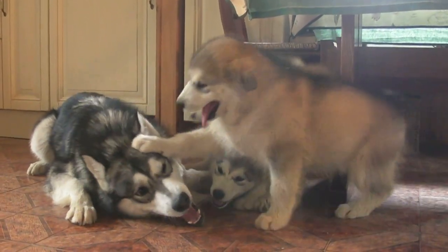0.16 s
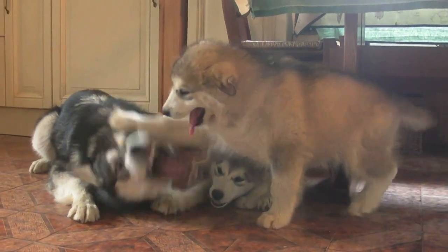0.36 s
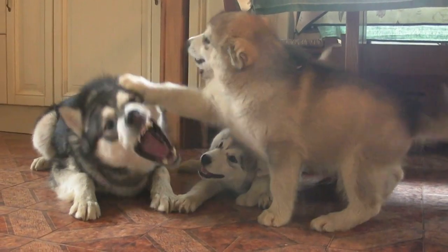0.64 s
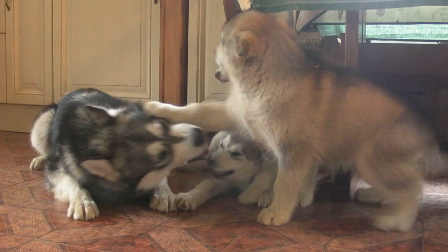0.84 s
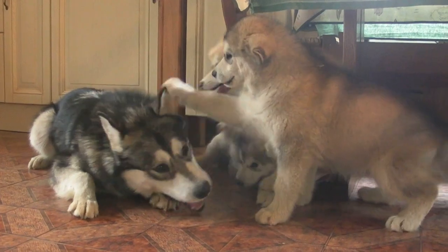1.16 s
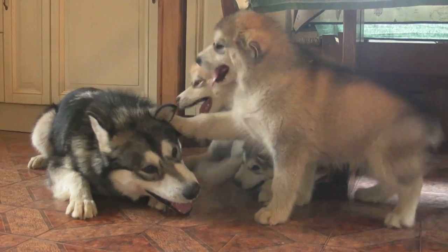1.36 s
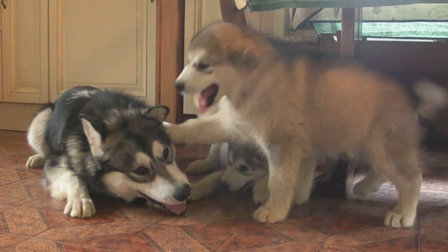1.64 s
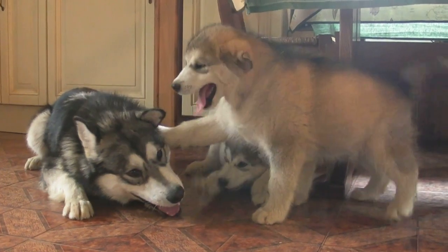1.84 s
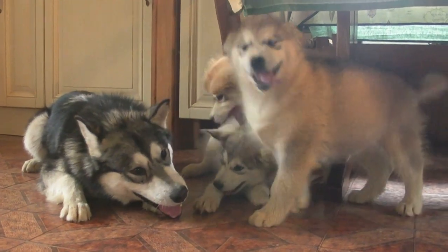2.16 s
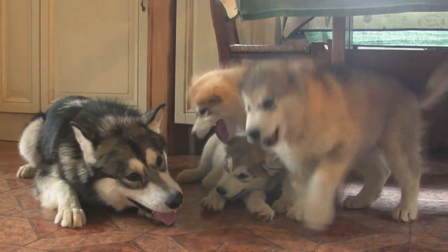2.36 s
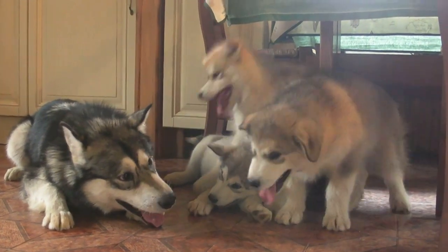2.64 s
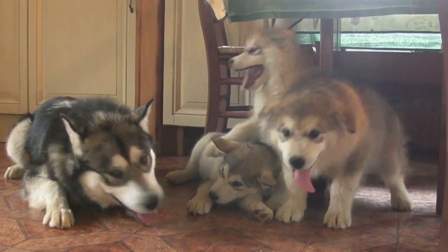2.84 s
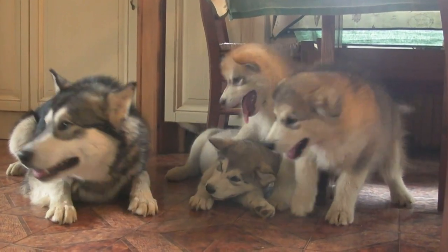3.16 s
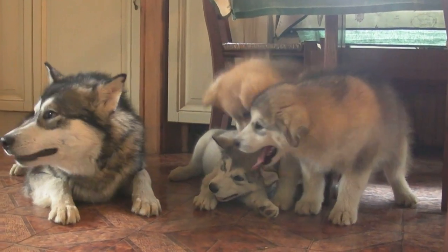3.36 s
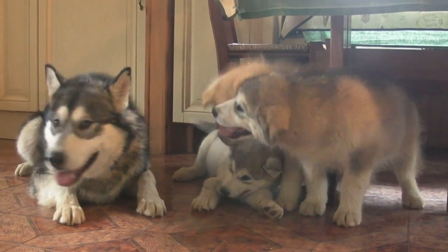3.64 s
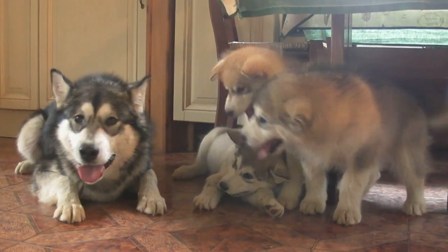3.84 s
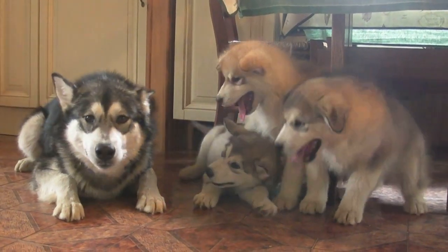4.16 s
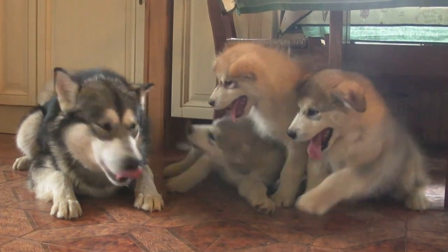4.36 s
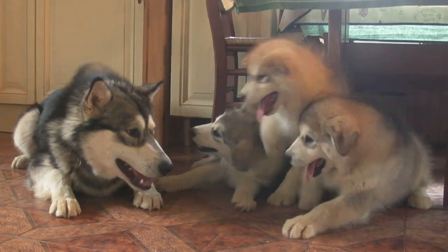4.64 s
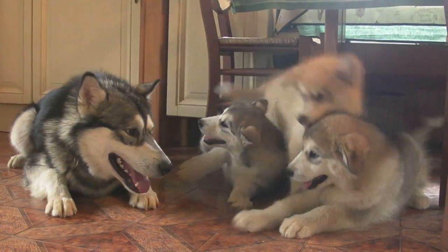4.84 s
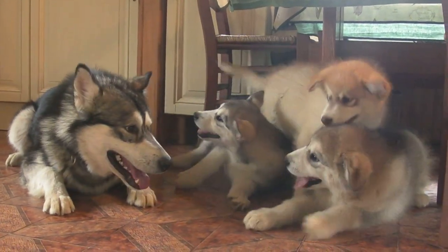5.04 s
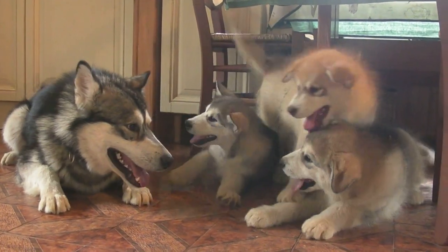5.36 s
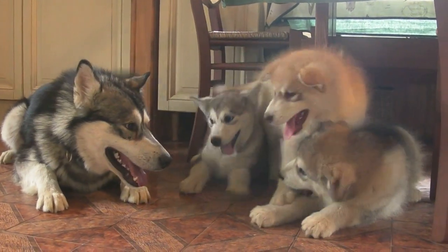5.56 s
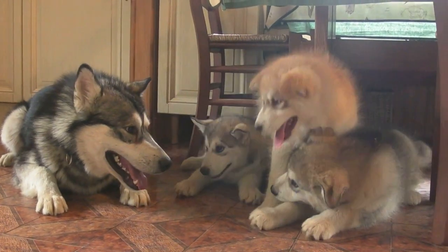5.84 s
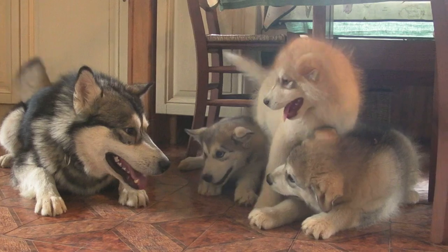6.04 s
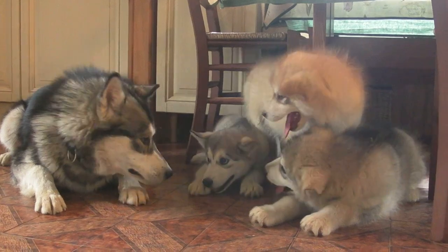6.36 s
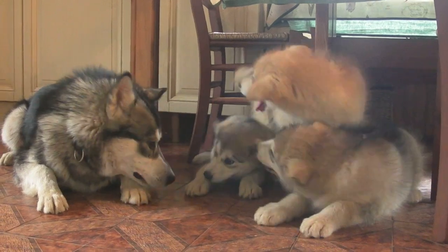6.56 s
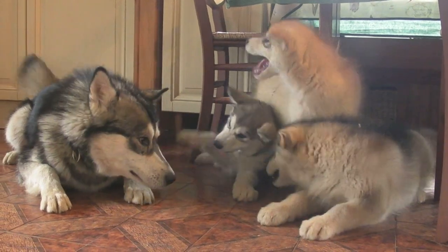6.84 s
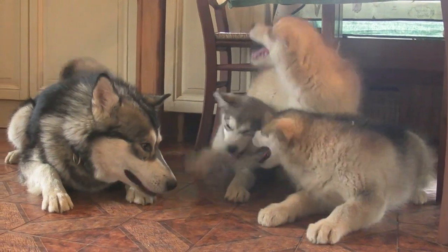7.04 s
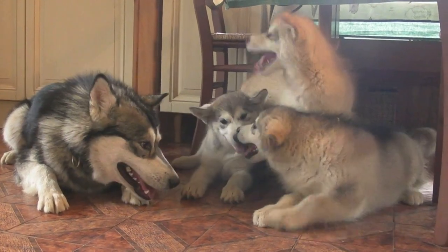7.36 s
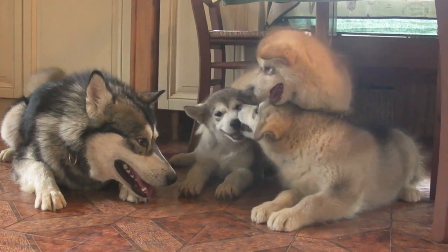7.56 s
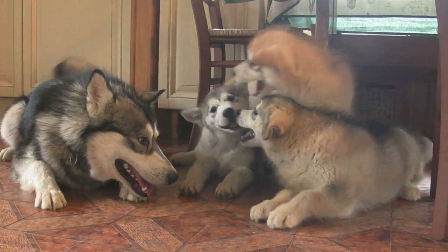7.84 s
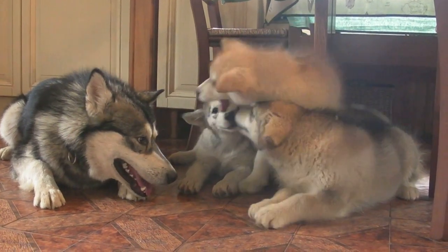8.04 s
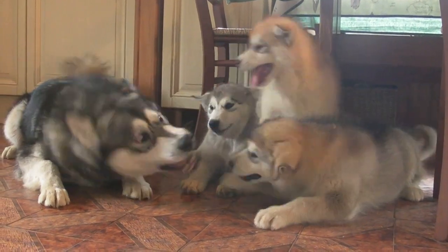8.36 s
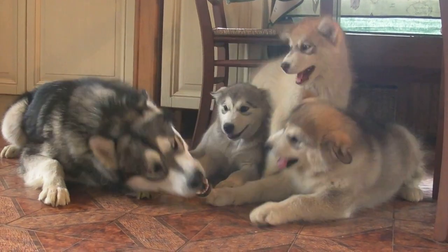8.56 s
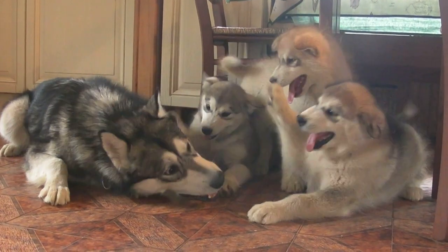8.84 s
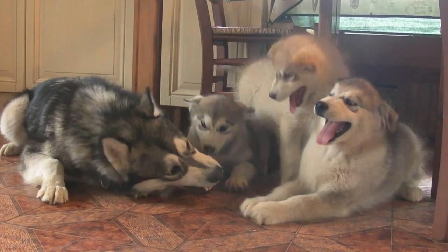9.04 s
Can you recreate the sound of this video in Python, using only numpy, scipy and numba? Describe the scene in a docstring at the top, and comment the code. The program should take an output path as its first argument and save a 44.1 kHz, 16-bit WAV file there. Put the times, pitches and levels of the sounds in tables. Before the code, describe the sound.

In a bare, echoing kitchen, a tiny nose whistle and sharp puppy yelps open the scene. A grown dog gives a short low snarl, something metal clinks, and longer wavering yelps follow. After about four and a half seconds the calls shrink to short yips and piercing thin whistles, with paw thumps, claw ticks and muzzle puffs. The dog snarls again near the end. Close stereo pickup, faint room noise.

```python
"""A tiny nose whistle and a pup's sharp yelp come first, in a bare kitchen that rings after every call.
More yelps, short yips and thin whistles follow, and a grown dog snarls back.
The voices are stacks of harmonics with uneven cycles and rasping air; the whistles are wavering sines.
Paws thump, claws tick, fur rustles and muzzles puff, all made of shaped noise; something metal clinks.
A faint, restless room noise lies under it all."""
import sys
import numpy as np
from scipy import signal
from scipy.fft import rfft, irfft, next_fast_len
from scipy.io import wavfile
from scipy.ndimage import uniform_filter1d, minimum_filter1d
from numba import njit

SR = 44100
rng = np.random.default_rng(int(sys.argv[2]) if len(sys.argv) > 2 else 0)


def wav_out(sig):
    """Save sig, one row per channel (or a flat mono array), as 16-bit PCM at SR to the path in sys.argv[1]."""
    wavfile.write(sys.argv[1], SR, np.round(np.clip(np.atleast_2d(sig).T, -1, 1) * 32767).astype(np.int16))


N = 405797
T = np.arange(N) / SR  # time in seconds
TOP_HZ = 15500  # no voice overtone lies above this, and the final sound is cut off here

# All levels in the tables are relative: mixing, room and gain control come later.
# Colour of the room noise: columns f/Hz, level/dB
FLOOR_COLOUR = [(15, -47), (25, -17.5), (113, -9.5), (144, -5), (340, -17.5), (509, -3), (666, -10.5),
                (722, -8.5), (1050, -10), (1450, -8.5), (3090, -15), (4870, -17), (6210, -20.5),
                (10100, -18), (15500, -24)]
FLOOR_DB = -44.5  # room noise level before it flutters
# Wall echoes, one row a band: columns f/Hz, t60/s (time to fade by 60 dB), level/dB
ROOM_BANDS = [(150, 0.69, -2), (487, 0.29, -1), (1200, 0.41, 0.5), (2600, 0.45, 0), (6360, 0.41, 4),
              (13600, 0.28, 6.5)]

# Air blown through a muzzle: columns t/s (middle of the puff), length/s, level/dB
PUFFS = [(1.232, 0.031, -28.5), (1.575, 0.16, -24), (2.277, 0.26, -26), (4.27, 0.094, -25),
         (4.556, 0.13, -31.5), (4.864, 0.25, -41), (5.078, 0.13, -29.5), (5.547, 0.12, -31),
         (5.68, 0.091, -41), (6.636, 0.18, -33.5), (7.274, 0.077, -35.5), (7.779, 0.034, -43),
         (8.005, 0.12, -40), (8.175, 0.25, -38), (8.755, 0.12, -33), (8.872, 0.081, -30.5)]
# Colour of blown air, also used for scraping: columns f/Hz, level/dB
PUFF_COLOUR = [(200, -33), (600, 9.5), (1200, 1.5), (1600, 7), (2100, 15), (2700, -0.5), (3300, 5.5),
               (4500, 2), (7000, -3), (11000, -12), (15000, -34)]
# Paws and bodies landing: columns t/s, level/dB
THUMPS = [(.208, -31), (.705, -16.5), (1.477, -33), (2.754, -23), (4.695, -25), (4.858, -20.5),
          (7.164, -26), (8.389, -28.5), (8.715, -23), (9.109, -25)]
# Colour of a landing: columns f/Hz, level/dB
THUMP_COLOUR = [(30, -35), (75, 2), (110, -8.5), (170, 0.5), (300, -12.5), (700, -9), (2000, -22),
                (8000, -38)]
# Claws and teeth: columns t/s, level/dB
TICKS = [(0.2239, -11), (1.2144, -32), (3.5863, -11), (4.8494, -24.5), (7.009, -35), (7.1694, -41),
         (7.46, -38), (8.111, -27), (8.31, -25.5), (8.8538, -33)]
# Colour of a tick, also used for rustling and whistle hiss: columns f/Hz, level/dB
TICK_COLOUR = [(200, -10), (800, -2), (2200, 0), (4500, -3), (9000, -7), (15000, -14)]
# One knock on something metal: t/s, level/dB
CLINK = (1.102, -20)
# The notes the metal rings at: columns f/Hz, level/dB, t60/s
CLINK_MODES = [(1710, -29, 0.34), (1637, -6.5, 0.22), (2330, -4, 0.25), (2393, -6, 0.12), (3470, -15, 0.2),
               (4630, -24, 0.51), (5650, -22, 0.48)]

# Drawn-out nose whistles, one curve each: columns t/s, pitch f/Hz, level/dB
WHINES = [
    [(5.815, 7200, -20), (5.835, 6590, -13), (5.87, 6540, -8), (5.908, 6444, -9), (5.92, 6970, -23),
     (5.95, 7120, -38)],
    [(6.543, 6350, -25), (6.565, 6125, -11.5), (6.59, 6250, -6), (6.61, 6640, -10), (6.635, 7440, -20),
     (6.68, 7500, -29)],
    [(7.85, 6110, -17), (7.885, 6334, -6), (7.912, 6800, -7), (7.94, 6680, -10.5), (8.02, 6780, -27)],
]
# Brief nose whistles, one glide each: columns t/s, length/s, start f/Hz, end f/Hz, level/dB, fade/dB
CHIRPS = [(0.034, 0.013, 6220, 6460, 2, 10.5), (1.179, 0.029, 6024, 6490, -3.5, 16),
          (1.36, 0.079, 6500, 6600, -29.5, 3), (1.742, 0.021, 6200, 6430, -19, 17.5),
          (2.222, 0.074, 6490, 6200, -17.5, 11.5), (2.739, 0.013, 6230, 6420, -18, 7.5),
          (5.426, 0.036, 5930, 6390, -21.5, 2.5), (5.56, 0.02, 7250, 6770, -20, 9.5),
          (5.72, 0.017, 5970, 6450, -20, 3), (6.062, 0.036, 6200, 6710, -9.5, 11),
          (6.367, 0.017, 6730, 6880, -21.5, 3), (6.887, 0.036, 6600, 6970, -15.5, 21),
          (7.227, .026, 5940, 6880, 4.5, 38.5), (8.134, 0.041, 6215, 6580, -15.5, 1.5),
          (8.445, 0.026, 6500, 6280, -24, 8.5)]

# Snarls of the grown dog; the curves at 0.733 and 0.853 s are one snarl, first at halved pitch:
# columns t/s, pitch f/Hz, level/dB
SNARLS = [
    [(.66, 131, -26), (.728, 169.6, -40)],
    [(.733, 129.1, -10), (.795, 135.9, -7.5), (.85, 126.2, -21)],
    [(.853, 252, -13), (.87, 237.3, -13.5), (.91, 208.4, -22.5), (.965, 241.7, -26), (1.0, 198, -36)],
    [(8.388, 277.8, -29), (8.41, 282.8, -10), (8.45, 324.5, -8.5), (8.49, 338, -16), (8.55, 329, -16),
     (8.6, 357.4, -5), (8.63, 376.4, 3), (8.65, 376.6, -22), (8.71, 376.4, -24), (8.76, 368.6, -17.5),
     (8.83, 396, -34.5)],
    [(9.135, 259, -17), (9.155, 291.4, -8.5), (9.18, 326, -5), (9.2, 346, -3)],
]
# How the dog's throat colours the upper harmonics of a snarl: columns f/Hz, level/dB
DOG_THROAT = [(350, -19), (700, -1), (1050, 5), (1600, -8), (2100, -18), (2800, -34.5), (4000, -31.5),
              (8000, -47.5), (15000, -49)]
# The two lowest harmonics: level in dB at curve level 0, and dB gained per dB of curve level
SNARL_FIRST_DB, SNARL_FIRST_GROWTH = -28.5, 0.13
SNARL_SECOND_DB, SNARL_SECOND_GROWTH = -13.5, 0.72
SNARL_ROUGH, SNARL_ROUGH_PER_S = .22, 2.6  # roughness at the start of a curve, and its growth per second

# Short yips: columns t/s, length/s, start f/Hz, middle f/Hz, end f/Hz, level/dB, drop towards both ends/dB,
# second harmonic level/dB, upper harmonics level/dB, roughness (0-1)
YIPS = [(4.898, 0.041, 320, 316.5, 322, -13.5, -1, 2.5, -10, 0.13),
        (5.022, 0.062, 550, 520.6, 474, -8.5, 14, 6.5, 1.5, 0.81),
        (5.752, .055, 907, 1128, 1206, -1, 6.5, 3.5, -20, 0.061),
        (6.18, 0.031, 567, 493, 412, -9.5, 0.5, 1.5, 6, 0.43),
        (6.549, 0.055, 300, 306, 303, -22, 7, -6, -8, 0.76),
        (6.72, .075, 428, 552, 593, -11.5, 8, -0.5, 5.5, 0.61),
        (6.786, .095, 590, 546, 484, -6.5, 6, 2.5, -3.5, 0.16),
        (7.045, 0.033, 482, 432.3, 378, -13, 0, -4, -0.5, 0.62),
        (7.98, 0.052, 703, 676, 644, -30, 3, -10, -20, 0.3),
        (8.207, 0.018, 754, 725, 666, -19, 2.5, -20, -28, 0.1),
        (8.843, 0.026, 440, 410.5, 389, -16, 1, -9, -6, 0.21),
        (9.03, 0.09, 488, 582.6, 468, -8, 15.5, 4.5, 2, 0.27)]
# How the throat colours the upper harmonics of a yip: columns f/Hz, level/dB
YIP_THROAT = [(1100, -0.5), (1500, 2), (1900, -3.5), (2300, 1.5), (2550, -4.5), (2850, 4.5), (3400, -11.5),
              (4100, -13.5), (5200, -17.5), (6500, -18), (9000, -25), (15000, -23)]
YIP_FADE_DB = 4  # fade from the start to the end of a yip

# Yelps: columns second harmonic level/dB, upper harmonics level/dB, curve of (t/s, pitch f/Hz, level/dB)
YELPS = [ (-2.5, 1, [(.048, 644, -12.5), (.07, 912, -8.5), (.09, 1230, 0), (.115, 1298, -6.5),
         (.15, 1245, -6)]), (-1, -1.5, [(.222, 1110, 0), (.26, 1172, -1.5), (.292, 1372, -4),
         (.325, 1175, 1.5), (.345, 1162, -12), (.38, 1093, 5.5), (.43, 1073, 7.5), (.475, 981, 0.5),
         (.52, 1116, 5.5), (.545, 1054, 0.5), (.565, 833, -10), (.59, 510, -9.5)]),
         (-1, 0.5, [(1.378, 595, -20), (1.398, 656, -10.5), (1.425, 959.5, -10), (1.46, 988, -15.5),
         (1.5, 917, -13.5), (1.55, 959, -11.5), (1.575, 865, -27.5), (1.6, 570, -23)]),
         (4.5, -3, [(1.767, 828, -5), (1.785, 990, -6), (1.81, 1282, -1.5), (1.83, 1527, -12),
         (1.86, 1244, -20)]), (-1.5, 2.5, [(1.908, 1202, -5), (1.935, 1128, -7), (1.97, 1245, 0),
         (2.0, 1286, -3.5), (2.025, 909, -10), (2.05, 631.6, -16), (2.1, 575.5, -19.5)]),
         (-0.5, -0.5, [(2.17, 617.4, -26.5), (2.215, 745.5, -17), (2.255, 692, -19.5), (2.29, 594, -7.5),
         (2.32, 649, -15), (2.35, 818, -2), (2.385, 787, -4.5), (2.45, 870, 4), (2.505, 989, 2),
         (2.54, 932, -7), (2.575, 673, -5.5), (2.61, 479, -11.5)]), (2, 2.5, [(2.753, 577.6, 0),
         (2.775, 628, -2.5), (2.805, 958, -3.5), (2.85, 837.3, -0.5), (2.96, 912, 1), (3.01, 969.4, -2),
         (3.05, 874, -5), (3.1, 779.3, 1), (3.16, 772.6, -2), (3.22, 734, -15.5), (3.27, 594, -7.5),
         (3.34, 595, -0.5), (3.39, 568, -1.5), (3.41, 523, -5)]), (2.5, -1, [(3.583, 567, 0.5),
         (3.62, 823, -7.5), (3.635, 1198, 1.5), (3.657, 1566, -3.5), (3.7, 1204, -13), (3.75, 998, -8),
         (3.79, 929, -2.5), (3.803, 789.3, 0.5), (3.84, 798, -9), (3.875, 692, -12.5), (3.98, 648.4, -9),
         (4.1, 741.7, 2.5), (4.15, 691, -12), (4.19, 532, -10.5)]), (-1, 2, [(4.334, 555, 6),
         (4.355, 704, -3), (4.378, 791, -3), (4.39, 1137, 7), (4.42, 1125, -4.5), (4.46, 1096, 0),
         (4.475, 1000, -15), (4.51, 592, -17.5), (4.56, 550.8, -18.5)]), ]
# How the pup's throat colours the upper harmonics of a yelp: columns f/Hz, level/dB
PUP_THROAT = [(900, -1), (1700, 5.5), (2300, 2.5), (3000, -0.5), (3600, -6.5), (4100, -21), (5300, -25),
              (6400, -20.5), (8000, -35), (12000, -37), (15000, -58)]
# How the pup's open mouth favours the two lowest harmonics of a yelp: columns f/Hz, level/dB
MOUTH = [(500, -10.5), (700, -6.5), (900, 3), (1100, 2.5), (1400, -4), (1750, 8.5), (2000, -1.5),
         (2250, -6.5), (2600, -13.5), (3000, -11.5)]
# Upper harmonics of a yelp by its pitch, weak in the highest yelps: columns pitch f/Hz, level/dB
YELP_OVERTONES = [(570, -9), (700, -5), (850, -4.5), (980, -3.5), (1100, -15.5), (1280, -27)]
# Overtones gain extra dB per dB above an easy yelp, and a little more as a yelp ends
EASY_DB, OVERTONE_GROWTH, ENDING_BRIGHT_DB, ENDING_S = -3.5, 0.067, 1, 0.028
# A yelp is clear above one pitch, grows hoarse towards the other, and low endings break up
CLEAR_HZ, HOARSE_HZ = 764, 500
CLEAR_ROUGH, LOW_ROUGH, END_ROUGH, BREAK_S = 0.12, 0.067, 0.53, 0.037


def undb(db):
    """Turn decibels into gain."""
    return 10 ** (np.asarray(db) / 20)


def on_log_axis(hz, points):
    """Read a curve of (Hz, value) points at any frequency, evenly per octave."""
    f, value = np.transpose(points)
    return np.interp(np.log(np.maximum(hz, 1)), np.log(f), value)


def noise(colour, size):
    """Random hiss in a given colour, scaled to an average strength (rms) of one."""
    n = next_fast_len(size, real=True)
    spectrum = rfft(rng.standard_normal(n))
    y = irfft(spectrum * undb(on_log_axis(np.fft.rfftfreq(n, 1 / SR), colour)), n)
    return y[:size] / y.std()


def walk(rate, size):
    """Smooth random wandering with a spread near 1, reaching a new value rate times a second."""
    at = np.arange(size) * rate / SR
    i = at.astype(int) % 1024
    points = rng.standard_normal(1025)
    return points[i] + (points[i + 1] - points[i]) * np.sin(np.pi / 2 * (at % 1)) ** 2


def add(track, s, sound):
    """Mix a sound into a track at a time in seconds."""
    i = max(int(s * SR), 0)
    track[i:i + len(sound)] += sound[:max(N - i, 0)]


def ring_down(t, t60):
    """A steady fade that loses 60 dB in t60 seconds."""
    return np.exp(-np.log(1000) * t / t60)


def background(flutter_db, side_db):
    """Faint room noise with a wandering level; a noise of opposite sign left and right widens it."""
    mid = noise(FLOOR_COLOUR, N) * undb(flutter_db * walk(9.8, N))
    side = undb(side_db) * noise([(100, -7), (2000, -16), (7000, 0), (15000, -4)], N)
    return undb(FLOOR_DB) * np.array([mid + side, mid - side])


def room(gap_s, build_s, width):
    """Dense wall echoes as fading noise, band by band; left and right differ mostly in the treble."""
    size = 32768
    t, f = T[:size], np.fft.rfftfreq(size, 1 / SR)
    spectra, echoes = rfft(rng.standard_normal((2, size))), 0
    band_hz = np.array(ROOM_BANDS)[:, 0]
    for (hz, t60, db), share in zip(ROOM_BANDS, np.eye(len(ROOM_BANDS))):
        band = on_log_axis(f, np.column_stack([band_hz, share]))
        decay = ring_down(t, t60) * np.clip((t - gap_s) / build_s, 0, 1)
        mid, side = undb(db) * irfft(spectra * band) * decay / np.linalg.norm(decay)
        side = side * min(0.012 + width * (hz / 6500) ** 2, .5)
        echoes = echoes + np.array([mid + side, mid - side])
    return echoes


def rustle(db, swell_db, grain_db):
    """Fur and paws brush the floor: bright noise with an uneven, grainy level."""
    return undb(db + swell_db * walk(3, N) + grain_db * walk(250, N)) * noise(TICK_COLOUR, N)


def puffs():
    """The dogs huff: blown air is noise that swells and sinks softly."""
    swell = sum(undb(db) * np.exp(-2 * (2 * (T - s) / length) ** 2) for s, length, db in PUFFS)
    return swell * noise(PUFF_COLOUR, N)


def hits(events, colour, decay_s):
    """Short dead blows on the floor: noise that starts at once and dies away quickly."""
    out, t = np.zeros(N), T[:SR // 4]
    for s, db in events:
        envelope = np.exp(-t / decay_s) * np.minimum(t / 0.00085, 1)
        add(out, s, undb(db) * noise(colour, len(t)) * envelope)
    return out


def clink(rattle, scrape_db):
    """A few metal notes ring down while the thing rattles and scrapes on the floor."""
    out, t = np.zeros(N), T[:SR // 2]
    ring = np.zeros(len(t))
    for hz, db, t60 in CLINK_MODES:
        rattling = 1 + rattle * walk(268, len(t))
        ring += undb(db) * rattling * np.sin(2 * np.pi * hz * t) * ring_down(t, t60)
    scrape = undb(scrape_db) * noise(PUFF_COLOUR, len(t)) * np.exp(-t / 0.041)
    start, level_db = CLINK
    add(out, start, undb(level_db) * (ring + scrape) * np.minimum(t / 0.004, 1))
    return out


def contour(rows, attack_s, release_s):
    """A call's smoothed control curves, and the gate that opens and closes it."""
    s, *columns = np.transpose(rows)
    t = np.arange(s[0], s[-1] + release_s, 1 / SR)
    opening = np.clip((t - s[0]) / attack_s, 0, 1)
    closing = np.clip((t[-1] - t) / release_s, 0, 1)
    curves = [uniform_filter1d(np.interp(t, s, c), size=300) for c in columns]
    return s[0], opening * closing, curves


def chirp_controls(start, length, from_hz, to_hz, db, fade_db):
    """A brief whistle is one straight glide of pitch and level."""
    return [(start, from_hz, db), (start + length, to_hz, db - fade_db)]


def whistles(waver, octave_db, air_db):
    """Air whistles in the nose: a wavering near-sine with a faint octave, over the hiss of the jet."""
    out = np.zeros(N)
    for rows in WHINES + [chirp_controls(*row) for row in CHIRPS]:
        start, gate, (hz, db) = contour(rows, attack_s=.011, release_s=.011)
        phase = 2 * np.pi * np.cumsum(hz * (1 + waver * walk(211.7, len(hz)))) / SR
        tone = np.sqrt(2) * (np.sin(phase) + undb(octave_db) * np.sin(2 * phase))
        hiss = undb(air_db) * noise(TICK_COLOUR, len(hz))
        # each whistle, tone and hiss together, starts 5 ms early because its gate opens slowly
        add(out, start - .005, gate ** 2 * undb(db) * (tone + hiss))
    return out


def voice(calls, throat, jitter, shimmer, rasp_db, half_db, uneven_db, attack_s, release_s, count):
    """Vocal folds whose cycles grow uneven with roughness; the throat shapes overtones, and air rasps."""
    out = np.zeros(N)
    for rows in calls:
        start, gate, curves = contour(rows, attack_s, release_s)
        hz, first_db, second_db, upper_db, rough = curves
        n, rough = len(hz), np.clip(rough, 0, 1)
        unsteady_hz = hz * (1 + jitter * rough * walk(hz.mean(), n) + 0.005 * walk(60.13, n))
        phase = 2 * np.pi * np.cumsum(unsteady_hz) / SR
        k = np.arange(3, count)[:, None]  # numbers of the upper harmonics
        # each overtone swells and fades as jaw and head move
        uneven = uneven_db * np.array([walk(24.6, n) for _ in k])
        upper = undb(on_log_axis(k * hz, throat) + uneven) * (k * hz < TOP_HZ)
        upper *= undb(upper_db) / np.sqrt((upper ** 2).sum(0))
        tone = undb(first_db) * np.cos(phase) + undb(second_db) * np.cos(2 * phase - 1)
        # the throat delays high overtones more, spreading each pulse over its cycle
        tone += (upper * np.cos(k * phase - .3 * k ** 2)).sum(0)
        # strong and weak cycles alternate when the voice breaks, adding lines between the harmonics
        alternate = undb(half_db) * walk(29.6, n) * np.cos(phase / 2)
        tone *= 1 + rough * (shimmer * walk(hz.mean() / 2, n) + alternate)
        highpass = signal.butter(4, hz.min(), "high", fs=SR, output="sos")
        air = signal.sosfilt(highpass, noise(throat, n))
        overtone_level = np.hypot(undb(second_db), undb(upper_db))
        # the air comes in one burst per cycle
        rasp = rough * undb(rasp_db) * overtone_level * air * (1 + np.cos(phase))
        add(out, start, gate * (np.sqrt(2) * tone + rasp))
    return out


def resample(curve):
    """Read a short curve at 200 evenly spaced times."""
    s, *columns = np.transpose(curve)
    t = np.linspace(s[0], s[-1], 200)
    return [t] + [np.interp(t, s, c) for c in columns]


def share_out(db, *parts_db):
    """Divide a level among parts with the given relative levels."""
    total_db = 10 * np.log10(sum(undb(p) ** 2 for p in parts_db))
    return [db + p - total_db for p in parts_db]


# The control functions below return rows of t/s, pitch f/Hz, first, second, upper level/dB, roughness.
def snarl_controls(curve):
    """A snarl curve brightens with effort, as its fundamental hardly grows, and roughens with time."""
    s, hz, db = resample(curve)
    first_db = SNARL_FIRST_DB + SNARL_FIRST_GROWTH * db
    second_db = SNARL_SECOND_DB + SNARL_SECOND_GROWTH * db
    rough = SNARL_ROUGH + SNARL_ROUGH_PER_S * (s - s[0])
    return np.column_stack([s, hz, first_db, second_db, db, rough])


def snarl(flap_hz, flap_depth):
    """The grown dog: as the voice gets rough, loose throat tissue flaps and chops it unevenly."""
    calls = [snarl_controls(curve) for curve in SNARLS]
    tone = voice(calls, DOG_THROAT, jitter=.06, shimmer=.45, rasp_db=-4, half_db=-5, uneven_db=3,
                 attack_s=.008, release_s=.015, count=30)
    rows = np.vstack(calls)
    rough = np.clip(np.interp(T, rows[:, 0], rows[:, -1]), 0, 1)
    flap = np.sin(2 * np.pi * np.cumsum(flap_hz * (1 + 0.29 * walk(flap_hz, N))) / SR)
    return tone * (1 + flap_depth * rough * flap)


def yip_controls(start, length, from_hz, mid_hz, to_hz, db, swell_db, second_db, upper_db, rough):
    """A yip is one arc of pitch and one of level, with a fade as the air runs out."""
    s, u = resample([(start, -1), (start + length, 1)])  # u runs from -1 to 1 over the yip
    hz = np.polyval(np.polyfit([-1, 0, 1], [from_hz, mid_hz, to_hz], deg=2), u)
    level_db = db - swell_db * u ** 2 - YIP_FADE_DB * (u + 1) / 2
    levels = share_out(level_db, 0, second_db, upper_db)
    return np.column_stack([s, hz, *levels, np.full(len(s), rough)])


def yip():
    """Short calls of a pup, each a small arc sung by the vocal folds."""
    calls = [yip_controls(*row) for row in YIPS]
    return voice(calls, YIP_THROAT, jitter=.04, shimmer=.3, rasp_db=-5, half_db=-13, uneven_db=4,
                 attack_s=.007, release_s=.016, count=20)


def yelp_controls(second_db, upper_db, curve):
    """Pitch and effort set a yelp's colour; low pitch makes it hoarse, most of all at its end."""
    s, hz, db = resample(curve)
    to_end = s - s[-1]
    bright_db = OVERTONE_GROWTH * (db - EASY_DB) + ENDING_BRIGHT_DB * np.exp(to_end / ENDING_S)
    levels = share_out(db, on_log_axis(hz, MOUTH), second_db + on_log_axis(2 * hz, MOUTH),
                       upper_db + bright_db + on_log_axis(hz, YELP_OVERTONES))
    slack = np.clip((CLEAR_HZ - hz) / (CLEAR_HZ - HOARSE_HZ), 0, 1)
    rough = CLEAR_ROUGH + slack * (LOW_ROUGH + END_ROUGH * np.exp(to_end / BREAK_S))
    return np.column_stack([s, hz, *levels, rough])


def yelp():
    """The pup's main calls: vocal folds driven along the yelp curves, coloured by throat and mouth."""
    calls = [yelp_controls(*row) for row in YELPS]
    return voice(calls, PUP_THROAT, jitter=.028, shimmer=.3, rasp_db=-9, half_db=-13, uneven_db=3,
                 attack_s=.004, release_s=.014, count=16)


def scene():
    """All the sounds heard directly, plus what each sends into the room's echoes."""
    floor_noise = background(flutter_db=3.5, side_db=-8.5)
    play = rustle(db=-62.5, swell_db=0.0, grain_db=5.5) + puffs()
    play += undb(-2.5) * hits(THUMPS, THUMP_COLOUR, decay_s=0.042)
    play += undb(0.5) * hits(TICKS, TICK_COLOUR, decay_s=0.0013)
    play += clink(rattle=0.55, scrape_db=-6)
    whines = whistles(waver=0.0074, octave_db=-21.5, air_db=-27.5)
    snarls = snarl(flap_hz=58, flap_depth=.55)
    yips = yip()
    yelps = yelp()
    near = undb(-1.0) * yelps + undb(-6.0) * yips + undb(-2.5) * snarls + play
    sent = undb(-4.5) * yelps + undb(-10.0) * yips + undb(-6.5) * snarls
    sent += undb(-10.0) * whines + undb(-6.5) * play
    walls = room(gap_s=0.008, build_s=0.00093, width=0.44)
    echoes = signal.fftconvolve(sent[None], walls, axes=1)[:, :N]
    near_whines = undb([[0], [-2]]) * whines  # 2 dB weaker on the right
    return near + near_whines + echoes + floor_noise


@njit
def follow(wanted, attack, release):
    """Gain reduction in dB: it closes fast and opens again at a steady rate."""
    out, held = np.empty(len(wanted)), 0.
    for i in range(len(wanted)):
        if wanted[i] > held:
            held = held + attack * (wanted[i] - held)
        else:
            held = max(held - release, wanted[i])
        out[i] = held
    return out


def gain_control(x, threshold_db, attack_s, release_db_per_s):
    """Loud calls are turned down after their first cycles; the room swells back as they end."""
    power = uniform_filter1d(x.mean(0) ** 2, size=220)
    level_db = 10 * np.log10(np.abs(power) + 1e-12)
    excess_db = np.maximum(level_db - threshold_db, 0)
    return x * undb(-follow(excess_db, 1 / (attack_s * SR), release_db_per_s / SR))


def record(dry):
    """Gain control, then a peak limiter, then a steep cut of the highest treble."""
    x = gain_control(dry, threshold_db=-14.0, attack_s=0.017, release_db_per_s=137.0)
    headroom = np.minimum(.84 / (np.abs(x).max(0) + 1e-9), 1)
    x = x * uniform_filter1d(minimum_filter1d(headroom, size=129), size=129)
    return signal.sosfilt(signal.ellip(10, .2, 80, TOP_HZ, fs=SR, output="sos"), x)


dry = scene()
out = record(dry)
wav_out(out)
```